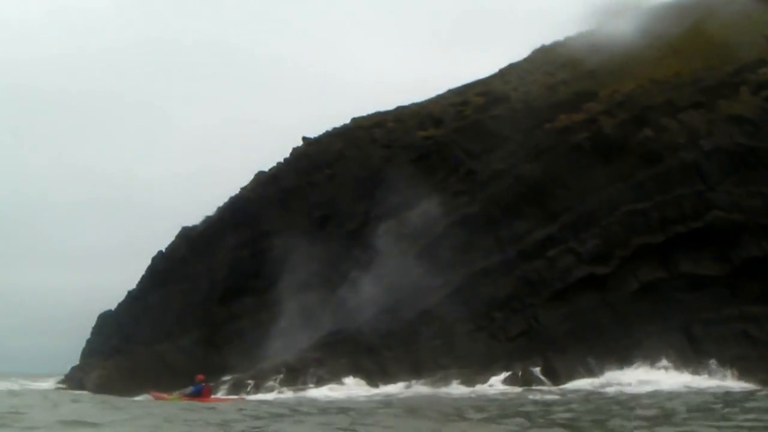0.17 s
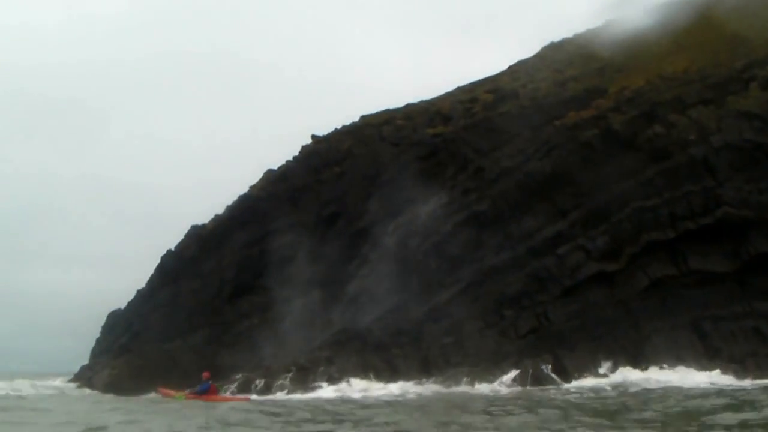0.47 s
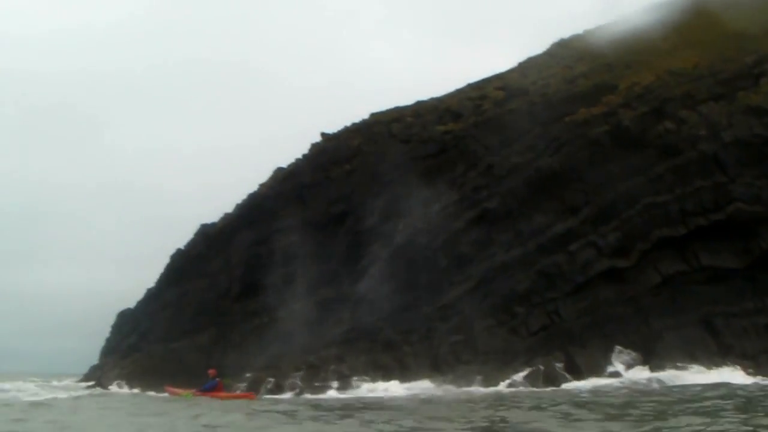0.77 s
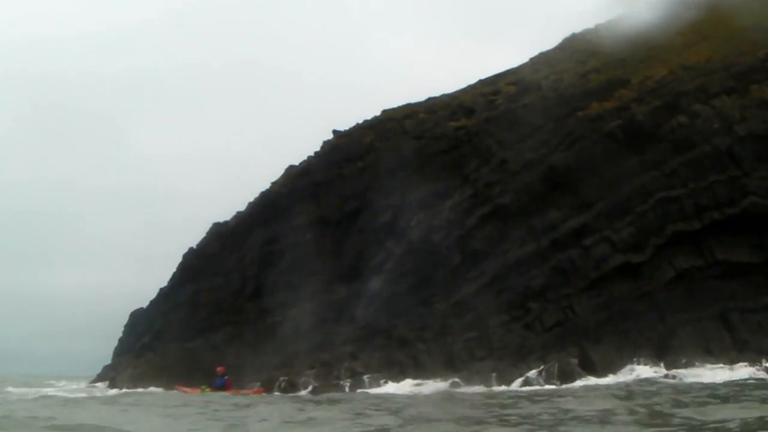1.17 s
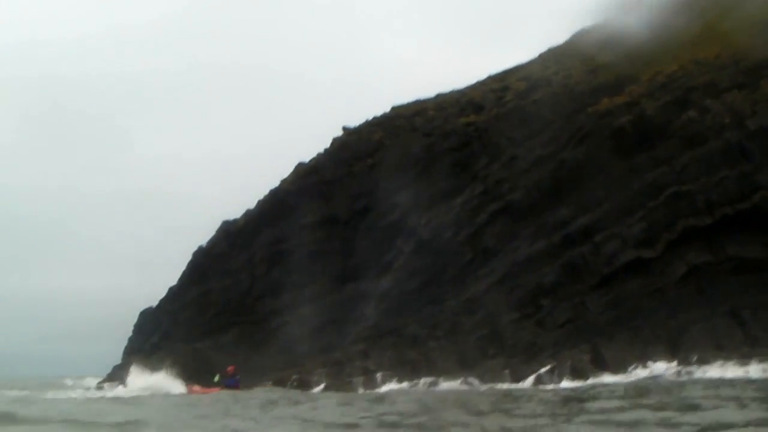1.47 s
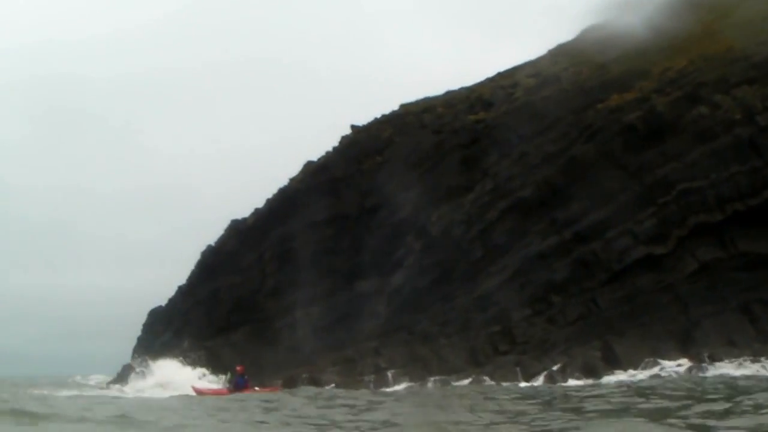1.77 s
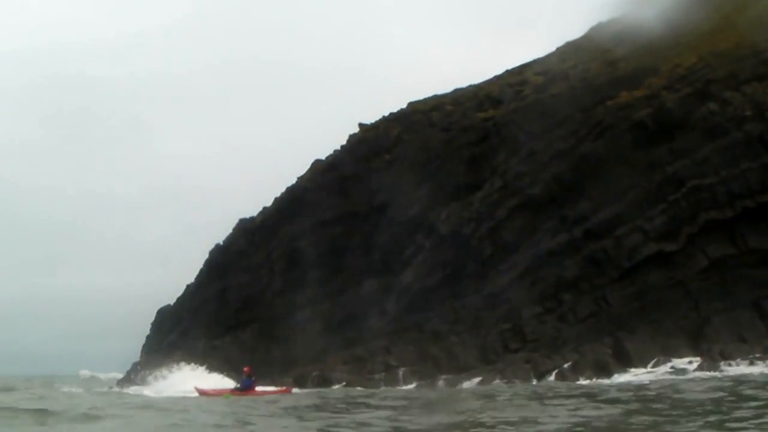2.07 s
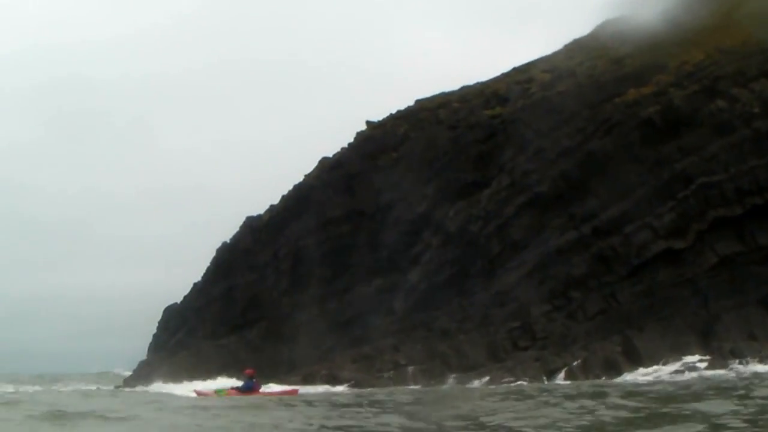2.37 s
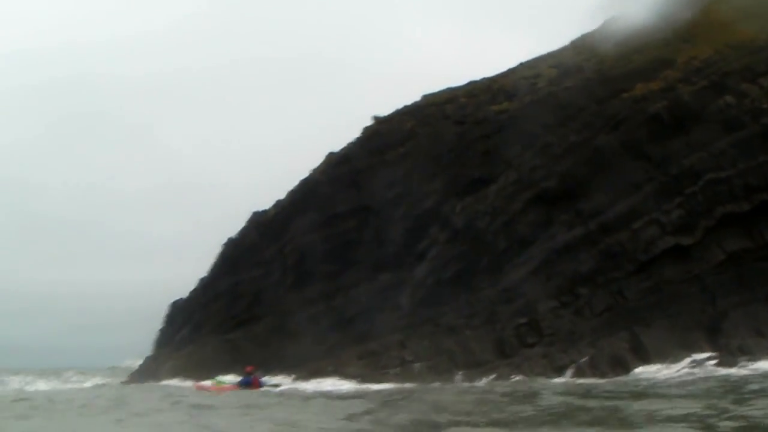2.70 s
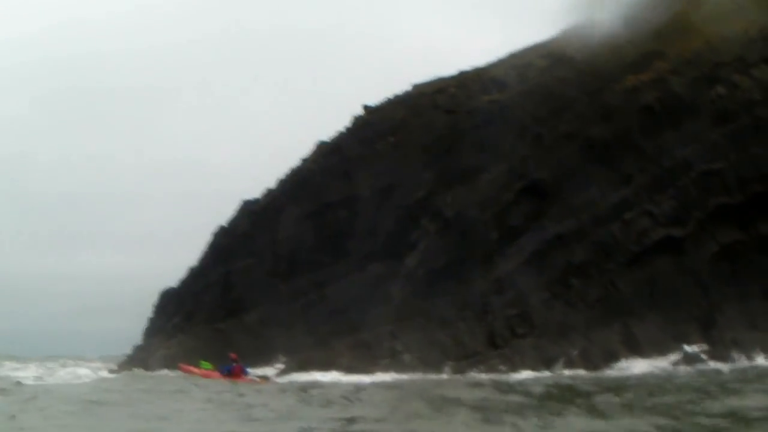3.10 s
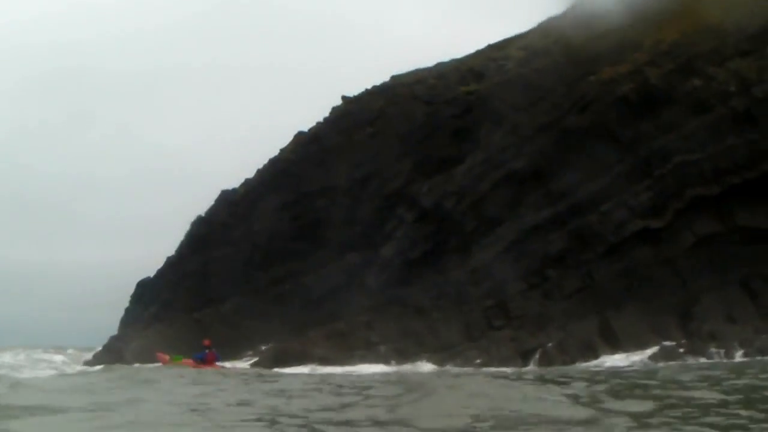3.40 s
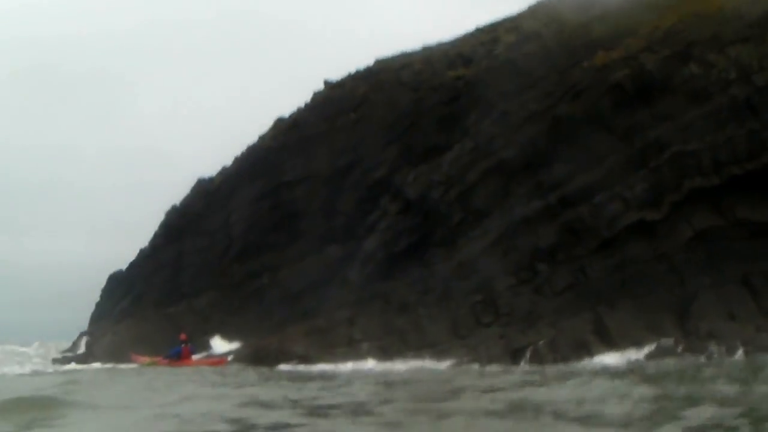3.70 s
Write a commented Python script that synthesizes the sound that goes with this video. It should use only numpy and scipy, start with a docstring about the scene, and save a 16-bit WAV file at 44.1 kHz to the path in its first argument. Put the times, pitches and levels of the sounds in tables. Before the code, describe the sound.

Continuous sea wash against a rocky shore outdoors, strongest in the first second and slowly easing, with hissing foam, a few close drop plinks, and low soft wind thumps on the microphone from the middle onward.

```python
"""At the foot of a rocky cliff, heard from the water some way off: choppy surf washes along the rocks.
The breakers roar and wash as coloured noise; foam and spray hiss as noise grained with random clicks.
Wind rumbles on the microphone as low noise, with one longer gust and a run of soft buffets midway.
A few drops plink close by as short rings, specks of spray tick on the housing as brief high noise,
and a faint low hum of two steady tones lies underneath."""
import sys
import numpy as np
from scipy import signal
from scipy.fft import rfft, irfft
from scipy.io import wavfile

SR = 44100
rng = np.random.default_rng(int(sys.argv[2]) if len(sys.argv) > 2 else 0)


def int16_out(signal):
    """Quantize to a 16-bit WAV file."""
    q = np.round(np.clip(np.atleast_2d(signal).T, -1, 1) * 32767)
    wavfile.write(sys.argv[1], SR, q.astype(np.int16))


N = 169785
T = np.arange(N) / SR  # seconds
HZ = np.maximum(np.fft.rfftfreq(N, 1 / SR), 1)  # kept above zero for the logarithm

# Weight of the breaking water, before its trim: time_s, level_db
SURGE = [(0, -29), (.15, -28.5), (.6, -27), (.7, -29.5), (1.15, -29), (1.28, -30), (1.5, -30.5),
         (1.73, -29.5), (1.84, -32.3), (1.96, -30), (2.16, -32), (2.35, -29.5), (2.7, -31.7), (2.85, -30),
         (3.02, -29), (3.07, -34.5), (3.4, -30), (3.85, -31.5)]
# Wash over the rocks, before its trim: time_s, level_db
WASH = [(0, -36.5), (.33, -35.2), (.55, -36.5), (1.25, -37), (1.7, -37.5), (2.15, -37), (2.3, -36),
        (2.75, -37.5), (3.27, -36.5), (3.85, -36.5)]
# Amount of foam: time_s, hiss_level_db
FOAM = [(0, -37.5), (.35, -35.5), (.7, -38), (1.1, -41), (1.6, -42), (2.05, -41.5), (2.4, -38),
        (2.58, -38.5), (2.75, -42), (3.3, -42.5), (3.85, -42.5)]
# Fine spray nearby: time_s, level_db
SPRAY = [(0, -48.5), (.34, -46.5), (.8, -48.3), (1.0, -52.5), (1.2, -57), (1.4, -51), (1.75, -56),
         (2.05, -54), (2.25, -53.5), (2.36, -51.5), (2.56, -54), (2.75, -55.5), (3.16, -56.5),
         (3.23, -52.5), (3.35, -55.3), (3.48, -54), (3.65, -56), (3.85, -55.5)]
ROAR_TRIM_DB, WASH_TRIM_DB = 0.24, 0.87

# Spectrum of each sound, relative: frequency_hz, density_db (per Hz)
ROAR_COLOUR = [(110, -24), (185, -12), (245, -22.5), (300, -12), (360, -2), (410, 0), (500, -4),
               (620, -5.5), (800, -10.5), (1100, -24), (1600, -50)]
WASH_COLOUR = [(450, -28), (750, -7), (1000, 0), (1400, -4.5), (2000, -7.5), (2700, -13), (4000, -18),
               (7000, -36)]
FOAM_COLOUR = [(1000, -19), (2200, -5), (3200, -4), (4600, -3.5), (6100, 0), (7200, -2.5), (7650, -11.5),
               (8100, -28)]
SPRAY_COLOUR = [(7700, -27), (8350, -3.5), (9700, -6), (12000, -5.5), (13500, 0.5), (14800, -2.5),
                (15800, -8)]
WIND_COLOUR = [(15, -24), (33, -12), (48, -22), (75, -3.5), (105, -3.5), (140, 4.5), (190, 1.5), (220, -9),
               (250, -21.5), (330, -19)]
GUST_COLOUR = [(30, -16), (80, -8), (125, 0.5), (175, -5), (245, -16), (350, -3.5), (450, -10), (650, -21)]
BUFFET_COLOUR = [(12, 0), (30, -5), (60, -2), (130, 6), (190, -11), (260, -13)]
SPECK_COLOUR = [(3000, -27), (6500, -2), (9000, -18), (11500, -7), (13500, 3), (15800, -3)]

# Stereo width of sea, wind and gust: frequency_hz, side_minus_mid_db
SEA_WIDTH = [(250, -15.5), (360, -19), (480, -18.5), (900, -17), (2000, -11), (3000, -6.5), (6000, -3.5),
             (8500, -0.7), (14000, -1.5)]
WIND_WIDTH = [(30, -13), (60, -12), (110, -11), (200, -13.5)]
GUST_WIDTH = [(60, -2.3), (400, -0.13)]
# Stereo spread of the surf over time, narrowing midway: time_s, side_gain_db
SPREAD = [(0, -0.7), (1.2, -0.5), (1.55, 0), (1.8, -5), (2.05, -1.5), (2.4, 0.2), (3.85, .7)]

# Bubbles bursting in foam and in fine spray; levels are against the hiss of each
FIZZ_PER_S, FIZZ_SPREAD_DB, FIZZ_DB = 900, 6.5, -12
CRACKLE_PER_S, CRACKLE_SPREAD_DB, CRACKLE_DB = 500, 3.5, -7.5

WIND_DB = -44
# One longer gust: bell-shaped in time, half length as standard deviation
GUST_AT_S, GUST_HALF_S, GUST_DB = 1.58, 0.21, -41
# Wind buffets, same bell shape: peak_s, half_length_s, level_db
BUFFETS = [(1.52, 0.022, -39), (1.675, 0.063, -39), (1.953, .025, -46), (2.03, .025, -41),
           (2.214, .018, -43), (2.37, 0.018, -40), (2.434, 0.02, -37)]
# Faint hum: pitch_hz, level_db (rms)
HUM = [(60, -60.5), (119.5, -49)]
# Drops that plink: start_s, pitch_hz, peak_db,
# ring_s (time to the peak; the late decay constant is half of it)
DROPS = [(.3133, 5600, -24, .0005), (.5275, 6640, -21, 0.00053), (0.5477, 2670, -25, 0.001),
         (1.4111, 5680, -17, 0.00067), (1.4168, 5900, -21, .0011)]
# Specks of spray that tick on the housing: start_s, tick_db
SPECKS = [(.317, -32), (.661, -32), (.9795, -34), (1.043, -32), (1.335, -40), (1.975, -41), (2.352, -31),
          (2.59, -39)]
# Decay times of the tick and of the spatter round it; spatter level against the tick
TICK_S, SPATTER_S, SPATTER_DB = .0005, .012, -12

# Balance at the microphone: frequency_hz, left_minus_right_db
BALANCE = [(100, -0.5), (500, -0.1), (1300, -.4), (3000, .5), (6000, 1.4), (9000, -1.3), (14000, -0.2)]
NOTCH_HZ, NOTCH_HALF_WIDTH_HZ = 8000, 204  # the recorder's narrow dead band
CUTOFF_HZ = 15760  # half power


def from_db(db):
    """Decibels to gain."""
    return 10 ** (np.asarray(db) / 20)


def rms_one(x):
    """Scale to rms 1."""
    return x / np.sqrt(np.mean(x ** 2) + 1e-20)


def level(rows):
    """Gain over time from (time_s, level_db) points."""
    return from_db(np.interp(T, *np.transpose(rows)))


def response(points):
    """Gain over frequency from (frequency_hz, db) points, joined on a log frequency scale."""
    hz, db = np.transpose(points)
    return from_db(np.interp(np.log(HZ), np.log(hz), db))


def drift(rate_hz):
    """Slow random motion: noise through a two-pole low-pass at rate_hz, scaled to rms 1."""
    step = 40  # samples between slow points
    pole = np.exp(-2 * np.pi * rate_hz * step / SR)
    settle = 2000  # slow points dropped while the filter settles
    noise = rng.standard_normal(N // step + 2 + settle)
    slow = signal.lfilter([1], [1, -2 * pole, pole * pole], noise)[settle:]
    return np.interp(np.arange(N) / step, np.arange(len(slow)), rms_one(slow))


def stereo(pair, colour, width):
    """Colour two unrelated signals and use them as mid (rms 1) and side."""
    lowest_hz, highest_hz = colour[0][0], colour[-1][0]
    # fade out beyond both ends of the colour table
    upper_end = 1 / (1 + (HZ / highest_hz / 1.2) ** 12)
    lower_end = 1 / (1 + (lowest_hz / HZ / 1.2) ** 12)
    mid, side = rfft(pair) * response(colour) * upper_end * lower_end
    mid = irfft(mid, N)
    side = irfft(side * response(width), N)
    return np.array([mid + side, mid - side]) / (mid.std() + 1e-12)


def noise_pair():
    """Two unrelated white noises."""
    return rng.standard_normal((2, N))


def rush(colour, width, churn_db, churn_hz):
    """Turbulent stereo noise whose level churns at random."""
    return stereo(noise_pair(), colour, width) * from_db(churn_db * drift(churn_hz))


def bursts(per_s, spread_db):
    """Two trains of random clicks of either sign, mostly small and a few large."""
    sizes = from_db(spread_db * np.minimum(rng.exponential(1, (2, N)), 5))
    signs = rng.choice([-1, 1], (2, N))
    happens = rng.random((2, N)) < per_s / SR
    return sizes * signs * happens


def bell(peak_s, half_s):
    """Smooth swell and fall in time, peak 1."""
    return np.exp(-.5 * ((T - peak_s) / half_s) ** 2)


def breakers():
    """The deep roar of entrained air and the brighter wash over the rocks."""
    roar = rush(ROAR_COLOUR, SEA_WIDTH, churn_db=0.53, churn_hz=20)
    wash = rush(WASH_COLOUR, SEA_WIDTH, churn_db=0.9, churn_hz=14)
    roar = level(SURGE) * from_db(ROAR_TRIM_DB) * roar
    wash = level(WASH) * from_db(WASH_TRIM_DB) * wash
    return roar + wash


def foam():
    """Hiss of foam and of fine spray, each grained with bursting bubbles."""
    hiss = rush(FOAM_COLOUR, SEA_WIDTH, churn_db=0.65, churn_hz=21)
    fizz = stereo(bursts(FIZZ_PER_S, FIZZ_SPREAD_DB), FOAM_COLOUR, SEA_WIDTH)
    mist = rush(SPRAY_COLOUR, SEA_WIDTH, churn_db=1.1, churn_hz=11)
    crackle = stereo(bursts(CRACKLE_PER_S, CRACKLE_SPREAD_DB), SPRAY_COLOUR, SEA_WIDTH)
    foam_sound = level(FOAM) * (hiss + from_db(FIZZ_DB) * fizz)
    spray_sound = level(SPRAY) * (mist + from_db(CRACKLE_DB) * crackle)
    return foam_sound + spray_sound


def spread(pair):
    """Narrow or widen the stereo image over time."""
    mid = pair.mean(axis=0)
    return mid + (pair - mid) * level(SPREAD)


def wind():
    """Wind on the microphone: a steady rumble, short deeper buffets, a gust felt apart at each port."""
    steady = from_db(WIND_DB) * rush(WIND_COLOUR, WIND_WIDTH, churn_db=1.05, churn_hz=4)
    push = sum(from_db(db) * bell(peak_s, half_s) for peak_s, half_s, db in BUFFETS)
    buffets = push * stereo(noise_pair(), BUFFET_COLOUR, WIND_WIDTH)
    gust = rush(GUST_COLOUR, GUST_WIDTH, churn_db=2.5, churn_hz=5.9)
    gust = from_db(GUST_DB) * bell(GUST_AT_S, GUST_HALF_S) * gust
    return steady + buffets + gust


def hum():
    """Two faint steady sine tones, each from a random phase."""
    out = np.zeros(N)
    for hz, db in HUM:
        out += from_db(db) * np.sqrt(2) * np.sin(2 * np.pi * (hz * T + rng.random()))
    return out


def drops():
    """Each drop close by rings for a few cycles, swelling and dying quickly."""
    out = np.zeros(N)
    for start_s, hz, peak_db, ring_s in DROPS:
        age = np.maximum(T - start_s, 0)
        swell = (age / ring_s * np.exp(1 - age / ring_s)) ** 2  # peak 1
        out += from_db(peak_db) * swell * np.sin(2 * np.pi * hz * age)
    return out


def specks():
    """Sharp high ticks of noise, each within a little spatter that starts before it and trails after."""
    envelope = np.zeros(N)
    for start_s, db in SPECKS:
        apart = abs(T - start_s)
        tick = (T >= start_s) * np.exp(-apart / TICK_S)
        spatter = from_db(SPATTER_DB) * np.exp(-apart / SPATTER_S)
        envelope += from_db(db) * (tick + spatter)
    return envelope * stereo(noise_pair(), SPECK_COLOUR, SEA_WIDTH)


def scene():
    """Sea, wind, hum and close spray at the microphone."""
    sea = spread(breakers() + foam())
    return sea + wind() + hum() + drops() + specks()


def record(dry):
    """Slightly unequal channels, a narrow notch in the treble and a steep cut at the top."""
    lean = np.sqrt(response(BALANCE))  # half the difference on each side
    notch = 1 - np.exp(-((HZ - NOTCH_HZ) / NOTCH_HALF_WIDTH_HZ) ** 4)
    top = 1 / np.sqrt(1 + np.minimum(HZ / CUTOFF_HZ, 1.1) ** 1600)  # ratio capped against overflow
    return irfft(rfft(dry) * np.array([lean, 1 / lean]) * notch * top, N)


dry = scene()
out = record(dry)
int16_out(out)
```